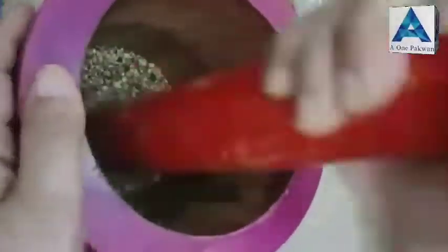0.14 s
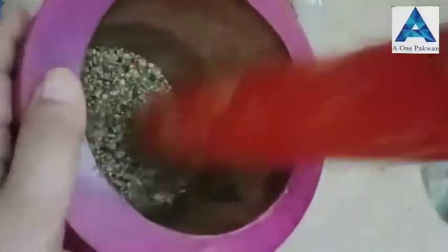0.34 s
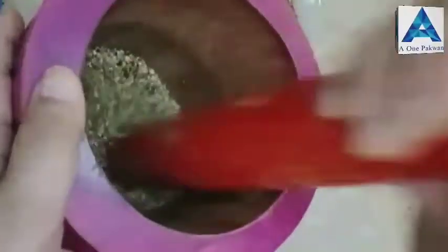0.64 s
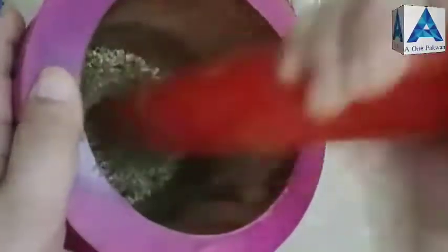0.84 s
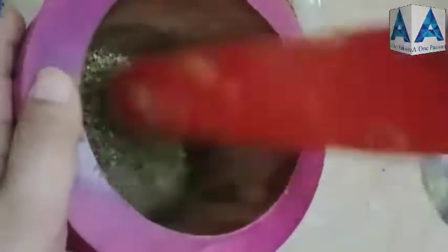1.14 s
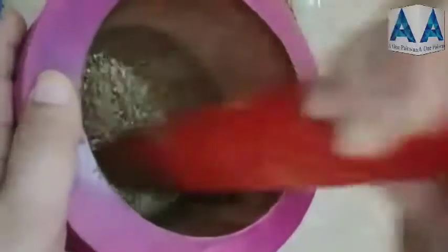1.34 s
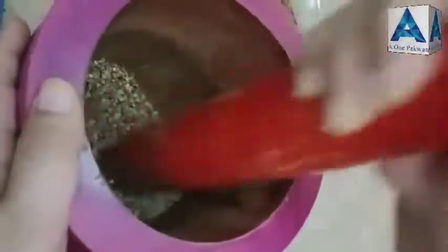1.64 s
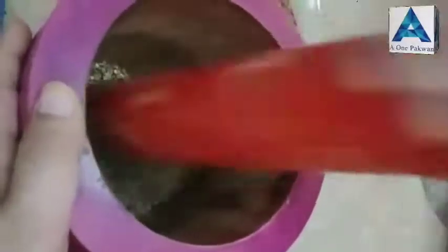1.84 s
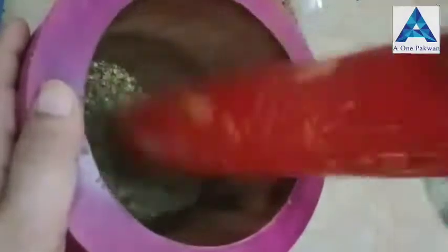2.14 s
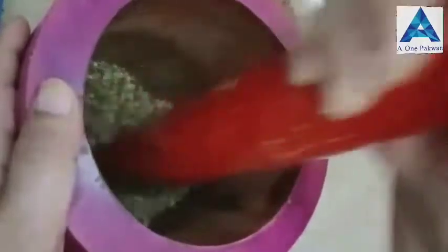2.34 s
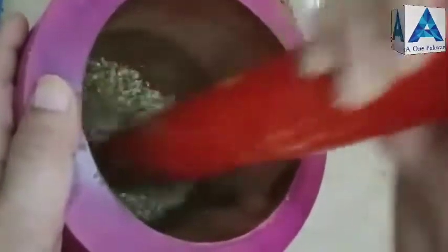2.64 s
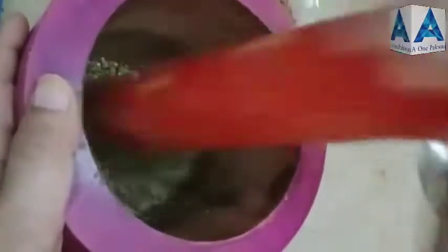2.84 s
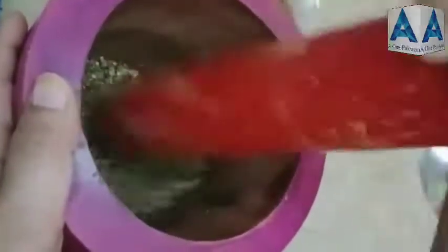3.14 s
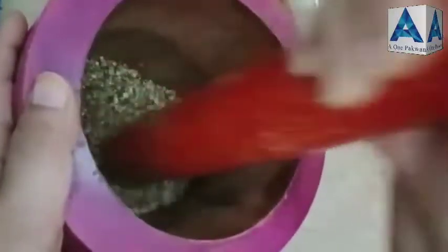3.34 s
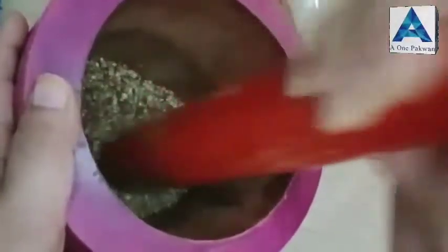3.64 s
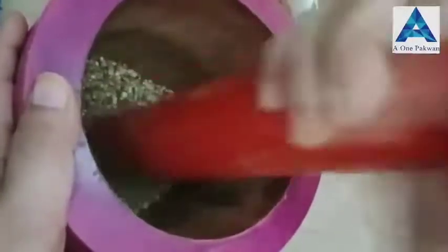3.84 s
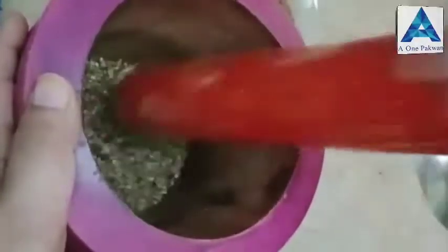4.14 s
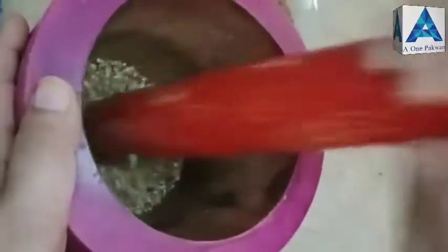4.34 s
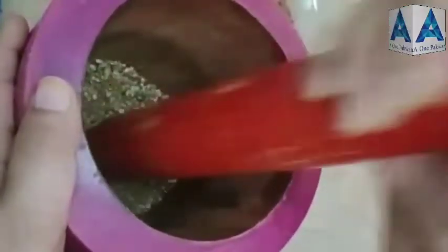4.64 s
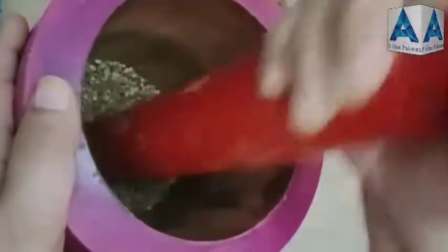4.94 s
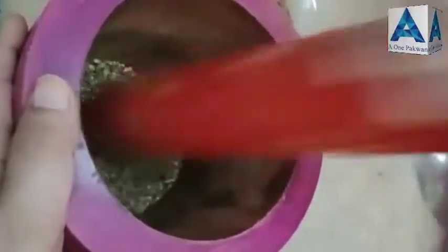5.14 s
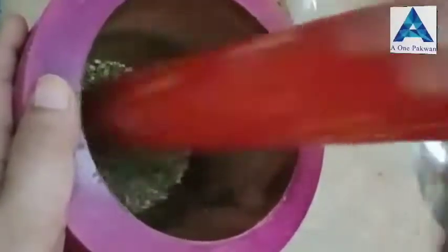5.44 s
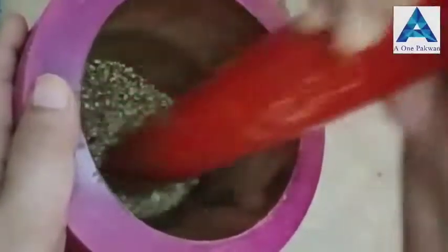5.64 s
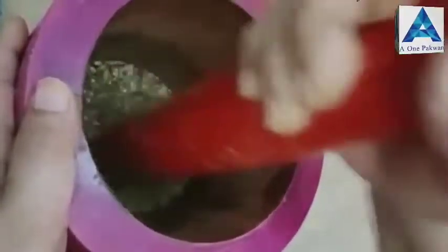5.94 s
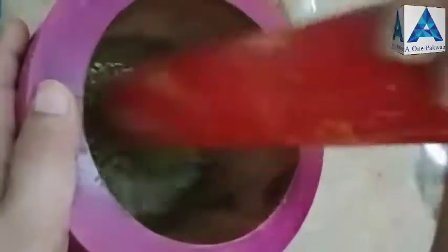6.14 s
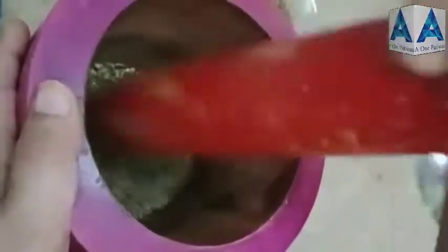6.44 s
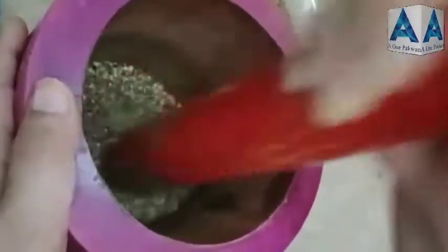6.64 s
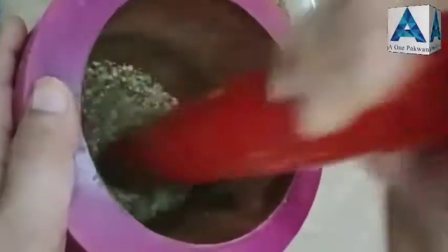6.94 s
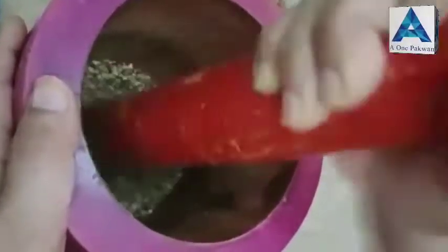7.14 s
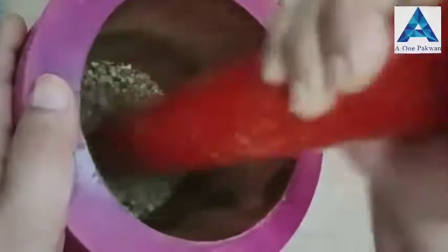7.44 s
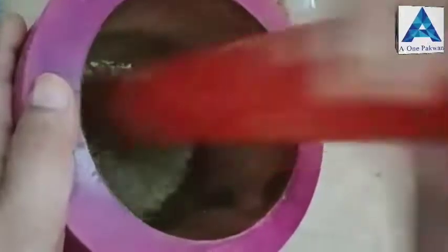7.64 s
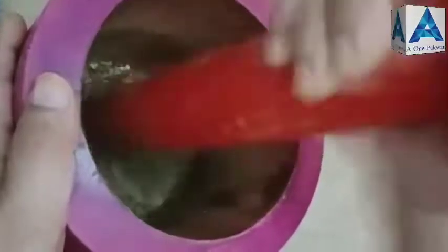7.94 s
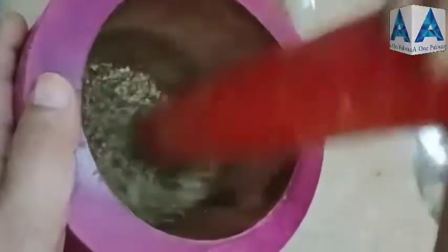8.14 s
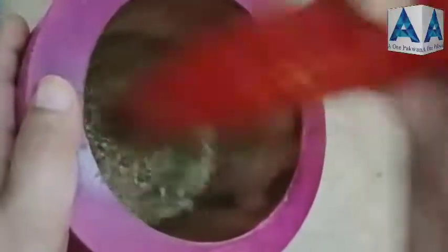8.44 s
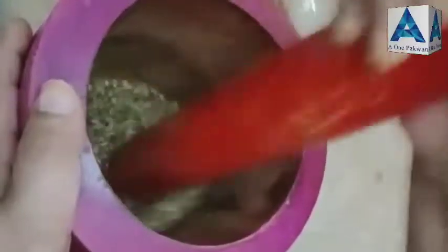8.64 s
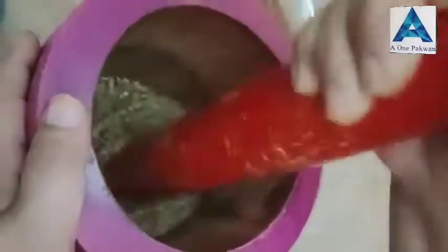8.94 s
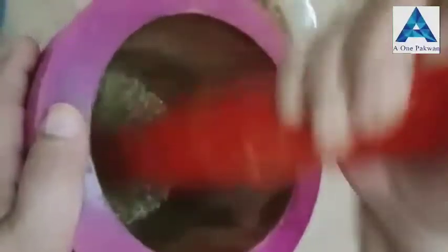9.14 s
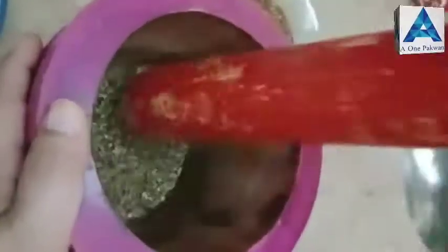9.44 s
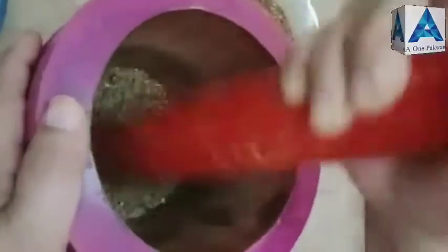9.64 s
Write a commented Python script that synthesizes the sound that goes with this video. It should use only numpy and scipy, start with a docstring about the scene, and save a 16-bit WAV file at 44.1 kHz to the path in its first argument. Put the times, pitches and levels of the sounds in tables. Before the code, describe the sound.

A close, slightly overloaded microphone in a small kitchen catches a pestle pounding hard seeds in a mortar. It opens on the tail of a push, then blows fall at about 0.3, 0.65, 0.97 and 1.3 s, roughly three a second, crisp and crunchy with light knocks. From 1.7 to 6 s they grow heavier: hollow woody knocks around the middle pitches, low counter thumps and short grinding pushes, with a softer blow near 4.3 s. From 6 to 8.1 s the crunch gets brighter and finer, and sliding seeds swish between blows, clearest from 7.2 to 8 s. From 8.25 to 9.5 s the pounding becomes hurried, irregular scraping and grinding, about ten strokes a second, with scattered knocks. It fades to a brief near-silence, with a faint rustle at 9.6 s, then one last crunchy knock at 9.74 s. Short, dull room echoes and faint, suppressed room noise lie underneath.

```python
"""On a kitchen counter stands a mortar in which a wooden pestle pounds hard seeds, then grinds them in quick strokes.
Each blow is a burst of seed fractures, a knock that rings the bowl, a thump in the counter and a short push;
pushes and grinding strokes are random grains of friction rung through resonances.
Seeds rustle as the pestle lifts, nearby walls echo the blows, and the room adds faint steady noise.
A small microphone stands close by; its noise suppression thins the tails and the hardest blows overload it."""
import sys
import numpy as np
from scipy import signal
from scipy.fft import rfft, irfft
from scipy.io import wavfile
from scipy.ndimage import uniform_filter1d

SR = 44100
rng = np.random.default_rng(int(sys.argv[2]) if len(sys.argv) > 2 else 0)


def makeup_ratio(level_db):
    """Linear amplitude ratio for a level in decibels (20 dB per factor of ten)."""
    decades = np.asarray(level_db, float) / 20
    return 10 ** decades


def generate_wav(signal):
    """Clip the signal to [-1, 1] and save it as 16-bit WAV at the path in sys.argv[1]."""
    frames = np.transpose(np.atleast_2d(signal))
    scaled = np.clip(frames, -1, 1) * 32767
    pcm = np.round(scaled).astype(np.int16)
    wavfile.write(sys.argv[1], SR, pcm)


N = 431298

# Spectrum of the room's steady noise: f/Hz, relative level/dB
ROOM_SPECTRUM = [(24, -41), (40, 1.5), (297, -1.5), (685, -5.5), (934, -6.5), (1130, -11), (1340, -9.5),
                 (12000, -40.5), (15600, -70), (22000, -120)]
# Resonances of counter, bowl, seed grit, rustling seeds, their top sheen, a metal utensil and sliding seeds:
# f/Hz, width/Hz, relative level/dB
COUNTER_MODES = [(94.8, 14, 2), (140.4, 37, -4), (195.1, 20, -1), (285.5, 22, -2.5)]
BOWL_MODES = [(359, 100, -8.5), (372, 31, -7.5), (392.4, 82, -11.5), (497, 24, 2), (533, 26, -0.5),
              (583.6, 43, -2.5), (632, 56, -7.5), (734, 100, -8.5), (841.5, 50, -5), (957, 310, -10),
              (997, 130, -5), (1117, 7.2, -14)]
GRIT_MODES = [(1282.6, 49, -2), (1526.5, 102, -0.5), (1631, 127, -4), (1830, 95, -3.5), (1969, 61, -6),
              (2320, 120, -5.5), (2499, 110, -0.5), (2629, 73, 2.5), (2788, 77, 0.5), (3000, 310, -1),
              (3353, 57, -16)]   # they also serve as the bowl's upper modes
RUSTLE_MODES = [(3670, 610, -4.5), (3943, 82, 2.5), (4155, 54, -2.5), (4568, 400, -7.5), (4680, 67, -3.5),
                (5000, 89, -2), (5170, 200, -3.5), (5785, 190, -8)]
SHEEN_MODES = [(7600, 1200, -10), (9200, 2200, -16.5), (12300, 2100, -34.5)]
UTENSIL_MODES = [(3680, 40, -1.5), (4510, 36, 5), (4270, 39, -7.5), (4800, 23, -7.5)]
SLIDE_MODES = [(2600, 720, -10), (4800, 2500, -4.5), (3830, 230, -2.5), (4300, 100, -0.5), (5630, 500, -10),
               (7230, 320, 8.5)]
# Seeds slide back as the pestle lifts: middle t/s, level/dB, half length/s
LIFTS = [(.19, -56.5, 0.036), (0.539, -54, .035), (0.883, -44.5, 0.021), (1.219, -41, 0.033),
         (3.262, -48, 0.032), (3.55, -51, 0.039), (3.874, -42, .02), (4.184, -55, 0.053),
         (6.868, -62.5, 0.041), (7.167, -40.5, 0.035), (7.452, -32.5, 0.041), (7.745, -32.5, 0.031),
         (8.008, -33.5, 0.037), (9.6, -41, 0.034)]
# The pestle pushes on after a blow: start t/s, length/s, counter rumble level/dB, bowl rub level/dB, grit level/dB
PUSHES = [(-.04, 0.12, -18, -14, -31.5), (0.28, 0.14, -23.5, -22, -32), (0.639, 0.14, -38, -30, -32.5),
          (0.981, 0.15, -35.5, -28, -31), (1.315, 0.15, -28, -25.5, -27.5),
          (1.664, 0.16, -22, -16.5, -23.5), (2.018, 0.15, -19, -14, -27), (2.366, 0.16, -23, -12.5, -29.5),
          (2.687, 0.16, -24, -23, -28), (3.01, .16, -13.5, -11, -26.5), (3.333, 0.14, -14, -10, -27),
          (3.661, .15, -17.5, -10.5, -31), (3.974, 0.064, -20.5, -24, -41), (4.307, .04, -40, -45, -44.5),
          (4.645, 0.11, -23.5, -14, -34.5), (4.98, 0.076, -18.5, -10, -39.5), (5.292, 0.1, -20, -17.5, -36),
          (5.623, 0.18, -23.5, -22, -25.5), (5.986, 0.18, -21.5, -21.5, -27),
          (6.342, 0.11, -21, -22.5, -30), (6.66, .12, -21.5, -19.5, -30), (6.956, 0.13, -23.5, -16, -29),
          (7.242, .12, -26.5, -22.5, -27.5), (7.536, .11, -25, -25.5, -26.5),
          (7.791, .11, -22.5, -25, -29.5), (8.081, .13, -24, -19.5, -24), (8.3, .05, -37, -17, -35),
          (9.734, .1, -23.5, -21.5, -30.5)]
# Quick grinding strokes: peak t/s, rise/s, counter rumble level/dB, bowl rub level/dB, grit level/dB
GRINDS = [(8.25, .03, -36.5, -44.5, -36), (8.359, 0.023, -31.5, -22, -21.5), (8.449, .03, -42, -24, -18),
          (8.501, .025, -34.5, -25.5, -20), (8.594, 0.027, -37, -24.5, -14),
          (8.63, .025, -21, -20.5, -22.5), (8.74, 0.041, -36.5, -28, -18.5),
          (8.794, 0.016, -29.5, -22.5, -24.5), (8.85, .025, -32, -27, -21.5),
          (8.905, 0.033, -23.5, -18.5, -22.5), (9.0, 0.027, -34.5, -24, -15.5),
          (9.038, 0.039, -29, -29.5, -16.5), (9.16, 0.054, -42.5, -28, -20),
          (9.211, .025, -30.5, -26, -28.5), (9.278, 0.027, -46, -22.5, -15.5),
          (9.335, 0.039, -26, -24.5, -20), (9.441, 0.032, -38.5, -34, -29), (9.498, .03, -44, -37.5, -37.5),
          (9.62, 0.066, -55, -60, -43.5), (9.69, .03, -54.5, -58.5, -49)]
# How friction runs; columns of the next six: counter, bowl, grit, rustle, upper bowl modes
# Change of level just after the blow: counter, bowl and rustle jump, grit and upper modes dip: level/dB
JOLT_DB = (9, 3.5, -18, 5, -2.5)
# Fall while the pestle slows: rate/(dB/s)
SAG_DB_PER_S = (63.3, 86.4, 30, 49.7, 120)
# Fall once it stops: rate/(dB/s)
RELEASE_DB_PER_S = (330, 210, 550, 600, 350)
# Shift of release when few seeds cushion the pestle: the bowl rings on, grit stops sooner:
# shift/(s per dB of bareness)
LINGER_S_PER_DB = (0.0021, 0.00544, -0.00154, 0.0093, 0.0084)
# Change of level when few seeds cushion it: change/(dB per dB of bareness)
BARE_DB_PER_DB = (0, -0.046, 0, -0.23, 0.025)
# Fade time of a grinding stroke against its rise: ratio
FADE_PER_RISE = (1.2, 1.8, 1.3, 1.3, 0.69)
# Seeds crushed: t/s, relative peak level/dB, length/s, relative brightness/dB
CRUNCHES = [(0.027, -19, 0.014, 7.5), (0.2805, -0.5, 0.0068, 1), (0.34, -12.5, 0.017, -5.5),
            (0.389, -23, 0.02, 0.5), (0.627, -1, 0.0092, 3.5), (0.6722, -3.5, 0.011, -2),
            (0.965, -3.5, 0.014, 5.5), (1.017, -12.5, 0.0054, 3), (1.054, -11.5, 0.0068, -4),
            (1.114, -23, 0.0074, 1.5), (1.3161, -1.5, 0.01, 4), (1.367, -12.5, 0.0093, 4),
            (1.436, -8.5, 0.0038, -1.5), (1.6655, -7, 0.0086, 4.5), (1.707, -9.5, 0.008, 0),
            (1.772, -10.5, 0.0075, -11.5), (2.018, 0, 0.0099, 4.5), (2.1086, -13.5, 0.0075, 5.5),
            (2.356, 3.5, 0.0073, 1), (2.362, -3, 0.0072, -3.5), (2.4063, -9, 0.0065, 2.5),
            (2.434, -12, 0.008, -1), (2.6742, -8.5, 0.013, 4), (2.685, 0, 0.0077, 5.5),
            (2.725, -7.5, 0.022, 3), (2.757, -8.5, 0.013, -3.5), (3.0121, 0.5, 0.0061, -1.5),
            (3.097, -13.5, 0.0056, 2), (3.3276, -7, 0.013, -1.5), (3.6585, -5, 0.0078, 5.5),
            (3.9783, -3.5, 0.0098, 5.5), (4.2934, -11, 0.008, -1), (4.3018, -9.5, 0.014, 5),
            (4.645, -4, 0.0059, 6), (4.6618, -13.5, 0.0091, -1.5), (4.9711, -11.5, 0.012, 2.5),
            (4.9782, -7.5, 0.0075, -3.5), (5.2953, -3, 0.0086, 1), (5.624, 0.5, 0.0058, -1.5),
            (5.726, -10.5, 0.015, -8), (5.9945, -9.5, 0.0085, 10), (6.04, -6, 0.0091, 2),
            (6.09, -2, 0.0085, -12.5), (6.256, -32.5, 0.0084, 16), (6.327, -5.5, 0.008, 8.5),
            (6.5657, -30.5, 0.0031, 26.5), (6.6462, 1.5, 0.0058, -2.5), (6.684, -8.5, 0.0062, 7.5),
            (6.9606, 1, 0.005, 12), (7.002, -8, 0.011, 3), (7.1456, -37, 0.0072, 26),
            (7.248, -5.5, 0.008, 10.5), (7.315, -10, 0.017, -2.5), (7.5318, -1, 0.0091, 6.5),
            (7.575, 0, 0.015, -4), (7.8057, -4, 0.013, 7), (7.854, -8.5, 0.035, 0),
            (7.889, -10.5, 0.015, -2.5), (8.0624, 2, 0.0049, 5.5), (8.1106, 0, 0.008, -1),
            (8.1333, -3.5, 0.018, -9), (8.263, -15.5, 0.0098, -0.5), (8.289, -12.5, 0.0027, -3.5),
            (8.3565, -3, 0.008, 6), (8.4455, -4.5, 0.0067, -12), (8.464, -9.5, 0.011, 3.5),
            (8.496, -10.5, 0.021, -3), (8.581, -5.5, 0.016, 0), (8.715, -11.5, 0.024, -9),
            (8.788, -8, 0.012, -2.5), (8.851, -4.5, 0.024, 1), (8.877, -7.5, 0.0073, 4.5),
            (9.0217, -5, 0.008, -6), (9.155, -2.5, 0.013, 1.5), (9.2743, -4, 0.01, -4.5),
            (9.2972, 1.5, 0.011, -4.5), (9.321, -1, 0.01, -1), (9.346, -10.5, 0.024, -2),
            (9.4344, -5.5, 0.0046, -4), (9.7433, -6, 0.013, 13)]
# Pestle meets the bowl: t/s, relative peak level/dB, relative counter thump level/dB, relative hardness/dB
KNOCKS = [(0.288, -11, -10, 31), (0.629, -59, -30, 10.5), (0.671, -24, -24.5, 10), (0.975, -22.5, -23, 10),
          (1.024, -19.5, -28.5, 14), (1.326, -16.5, -14, 11.5), (1.678, 0.5, -19, 1),
          (2.029, -1.5, -30.5, -3), (2.373, 3, -31.5, 3), (2.694, -25.5, -29, 3.5), (3.015, 2.5, -11, 1.5),
          (3.098, -7.5, -16, 3.5), (3.332, 1, -11.5, 5), (3.658, -4.5, -19, -4), (3.666, 8, -20, -4.5),
          (3.671, -6.5, -19, -9.5), (3.984, -9, -15, -22.5), (4.66, 1, -22, 2), (4.972, 1.5, -10, -15.5),
          (4.985, -1, -16.5, 0), (5.305, 1.5, -19, 3), (5.626, -9, -18.5, 3), (5.639, 0, -26.5, -6.5),
          (6.001, 0, -11, -8.5), (6.335, -5.5, -10, -2.5), (6.653, -4.5, -10.5, -3.5),
          (6.962, -16.5, -26, -7.5), (6.968, -5, -19, -1), (6.993, -10, -21.5, 7.5), (7.253, -10, -23, 12),
          (7.533, -12, -14, 7), (7.811, -11.5, -11.5, 11.5), (8.066, -1, -9, 0), (8.098, -7, -26.5, 4),
          (8.293, -15.5, -39.5, -8), (8.306, -4, -47, 2), (8.474, -16.5, -23, 11), (8.611, -10, -32.5, 6),
          (8.735, -18, -26.5, 14), (8.883, -1, -25, -1), (8.905, -5.5, -14, -9), (8.999, -21.5, -32, 11),
          (9.152, -18, -26.5, 19), (9.274, -16, -23, 9), (9.744, -9, -14, 8)]


def rms_one(x):
    """Scale to unit rms."""
    return x / np.sqrt(np.mean(x ** 2) + 1e-20)


def cut(x, hz, kind, order=2):
    """Butterworth filter."""
    return signal.sosfilt(signal.butter(order, hz, kind, fs=SR, output="sos"), x)


def drift(rate):
    """Random wander of spread 1, turning at most 80 times a second."""
    steps = rng.standard_normal(int(N / SR * 80) + 2)
    place = np.arange(N) / SR * min(rate, 80)
    # straight lines between the steps lose spread; the factor restores it
    return np.interp(place, np.arange(len(steps)), steps) * np.sqrt(1.5)


def resonate(x, hz, width):
    """Two-pole resonance, gain 1 on top."""
    r = np.exp(-np.pi * width / SR)
    top = np.array([1, 0, -1]) * (1 - r * r) / 2
    bottom = [1, -2 * r * np.cos(2 * np.pi * hz / SR), r * r]
    return signal.lfilter(top, bottom, x + 1e-18)


def grains(per_s, spread_db):
    """Tiny fractures at random moments, a few much larger than the rest; rms 1."""
    sizes = makeup_ratio(spread_db * np.minimum(rng.exponential(1, N), 5)) * rng.choice([-1, 1], N)
    return rms_one(sizes * (rng.random(N) < per_s / SR))


def rubbed(modes, per_s, spread_db, wander_db):
    """Grains set the modes going; the shifting contact favours now one mode, now another; rms 1."""
    force = grains(per_s, spread_db)
    out = np.zeros(N)
    for k, (hz, width, db) in enumerate(modes):
        contact = force * makeup_ratio(wander_db * drift(9.0))
        out += (-1) ** k * makeup_ratio(db) * resonate(contact, hz, width)
    return rms_one(out)


def room_tone():
    """Faint steady noise of the room: random noise shaped by its spectrum."""
    hz, db = np.transpose(ROOM_SPECTRUM)
    bins = np.maximum(np.arange(N // 2 + 1) * SR / N, 1)
    shape = makeup_ratio(np.interp(np.log(bins), np.log(hz), db))
    noise = irfft(rfft(rng.standard_normal(N)) * shape, N)
    return makeup_ratio(-44.5) * rms_one(noise)


def kitchen(x):
    """Echoes of nearby walls: a dull noise tail that dies away."""
    t60_s, level_db = 0.3, -17.5
    t = np.arange(round(.3 * SR)) / SR
    tail = cut(rng.standard_normal(len(t)), 4500, "low") * makeup_ratio(-60 * t / t60_s)
    tail = tail * (t > .004)   # the walls answer after 4 ms
    return makeup_ratio(level_db) * signal.fftconvolve(x, tail / np.sqrt(np.sum(tail ** 2)))[:N]


def lifts():
    """Seeds slide back as the pestle lifts: a soft bright swish that swells and fades."""
    t = np.arange(N) / SR
    swell = sum(makeup_ratio(db) * np.exp(-((t - s) / half) ** 2) for s, db, half in LIFTS)
    return swell * rubbed(SLIDE_MODES, 12000, 2.5, 1.5)


def friction_levels(s, db):
    """Levels of counter, bowl, grit, rustle and upper bowl modes; rustle grows as the seeds get finer."""
    rumble_db, rub_db, grit_db = db
    rustle_db = grit_db - 11 + 0.46 * s
    return np.array([rumble_db, rub_db, grit_db, rustle_db, rub_db])[:, None]


def friction_db():
    """Friction over time: powers of pushes, which start, sag and release, and of swelling grinding strokes add up."""
    push_rise_s, jolt_s, cushion_db = 0.0056, 0.01, 10
    t = np.arange(0, N + 32, 32) / SR
    power = 1e-9
    columns = (JOLT_DB, SAG_DB_PER_S, RELEASE_DB_PER_S, LINGER_S_PER_DB, BARE_DB_PER_DB, FADE_PER_RISE)
    jolt, sag, release, linger, bare, fade = (np.array(v)[:, None] for v in columns)
    for s, length, *db in PUSHES:
        age = np.maximum(t - s, 0)
        # rub far above grit: few seeds cushion the pestle
        bare_db = max(db[1] - db[2] - cushion_db, 0)
        stopped = np.maximum(age - length - linger * bare_db, 0)
        shape_db = bare_db * bare + jolt * np.exp(-age / jolt_s) - sag * age - release * stopped
        rise = np.minimum(age / push_rise_s, 1)
        power = power + (makeup_ratio(friction_levels(s, db) + shape_db) * rise) ** 2
    for s, rise, *db in GRINDS:
        spread = rise * np.where(t > s, fade, 1)
        power = power + makeup_ratio(2 * friction_levels(s, db)) * np.exp(-2 * ((t - s) / spread) ** 2)
    return [np.interp(np.arange(N) / SR, t, row) for row in 10 * np.log10(power)]


def utensil_buzz(rub_db):
    """Something metal on the shaken counter buzzes along with the rub, less than in proportion."""
    return makeup_ratio(.75 * rub_db - 33) * rubbed(UTENSIL_MODES, 3000, 2.5, 3.5)


def counter_and_bowl_rub(rumble_db, rub_db, upper_db):
    """Friction shakes counter and bowl, and reaches the high modes ever more weakly."""
    counter = makeup_ratio(rumble_db) * rubbed(COUNTER_MODES, 2000, 3.0, 3.4)
    bowl = makeup_ratio(rub_db) * cut(rubbed(BOWL_MODES, 1500, 3.0, 3.68), 1900, "low")
    upper_modes = [(hz, width, -6.0 - 15.0 * np.log2(hz / 1000)) for hz, width, _ in GRIT_MODES + RUSTLE_MODES]
    upper = makeup_ratio(upper_db - 8.5) * cut(rubbed(upper_modes, 1500, 2.2, 2.7), 4200, "low", order=4)
    return counter + bowl + upper


def seed_friction(grit_db, rustle_db):
    """Seeds grate, snap and rustle in stick and slip, a fast random wander of level."""
    snaps = makeup_ratio(-6) * rubbed(GRIT_MODES + RUSTLE_MODES, 120, 3.1, 4.7)   # lone seeds giving way
    grating = cut(rubbed(GRIT_MODES, 2300, 3.8, 3.0), 3100, "low")
    grit = makeup_ratio(grit_db) * (grating + cut(snaps, 6000, "low"))
    rustle = makeup_ratio(rustle_db) * cut(rubbed(RUSTLE_MODES, 3900, 3.5, 1.5), 4900, "low", order=4)
    # the top grows a little faster than the rustle: brisk scraping brings it out
    sheen = makeup_ratio(1.1 * (rustle_db + 27) - 34.5) * rubbed(SHEEN_MODES, 3500, 1.3, 1.1)
    return makeup_ratio(2.0 * drift(45)) * (grit + rustle + sheen)


def strokes():
    """The pestle pushes through the seeds: the same pushes and strokes drive counter, bowl, utensil and seeds."""
    rumble_db, rub_db, grit_db, rustle_db, upper_db = friction_db()
    low = counter_and_bowl_rub(rumble_db, rub_db, upper_db)
    return low + utensil_buzz(rub_db) + seed_friction(grit_db, rustle_db)


def crunches():
    """A burst of breaking seeds swells over a few ms and dies at a pace set by its length."""
    dull, bright = np.zeros(N), np.zeros(N)
    lead_s = .02
    t = np.arange(round(.1 * SR)) / SR - lead_s
    for s, peak_db, length, bright_db in CRUNCHES:
        age = (t - .002) / max(length, .003)
        burst = makeup_ratio(peak_db - 4.5) / (np.exp(-age / 0.19) + np.exp(age / 0.55))
        at = np.clip(round((s - lead_s) * SR) + np.arange(len(t)), 0, N - 1)
        dull[at] += burst
        bright[at] += makeup_ratio(bright_db - 10.0) * burst
    damped = [(hz, 1.6 * width, db) for hz, width, db in GRIT_MODES]   # the pressed pestle damps the bowl
    body = cut(rubbed(damped, 5000, 4.3, 4.3), 4000, "low")
    body = body + makeup_ratio(-14.5) * rubbed(BOWL_MODES, per_s=1600, spread_db=4.5, wander_db=2.0)
    return dull * body + bright * rubbed(RUSTLE_MODES + SHEEN_MODES, 6000, 3.8, 2.9)


def struck(modes, levels_db, contact_hz, scatter_db):
    """Each knock strikes every mode with a strength of its own; a soft contact is a dulled click."""
    at = np.round(np.array(KNOCKS)[:, 0] * SR).astype(int)
    luck = rng.standard_normal((len(at), len(modes)))
    out = np.zeros(N)
    for k, (hz, width, db) in enumerate(modes):
        clicks = np.zeros(N)
        # the last factor makes the ring equally high for every width
        clicks[at] = makeup_ratio(levels_db(hz) + db + scatter_db * luck[:, k]) * SR / (2 * np.pi * width)
        out += resonate(clicks, hz, width)
    return cut(out, contact_hz, "low", order=4)


def knocks():
    """The bowl rings, damped by the pestle and brighter for a hard contact, and the counter booms under it."""
    _, peak_db, thump_db, hard_db = np.transpose(KNOCKS)
    tilt_db_per_octave = np.minimum(hard_db - 6.5, 2)
    damped = [(hz, 1.4 * width, db) for hz, width, db in BOWL_MODES + GRIT_MODES]

    def bowl_db(hz):
        """Hardness tilts the level of the modes around 500 Hz."""
        return peak_db - 11.0 + tilt_db_per_octave * np.log2(hz / 500)

    bowl = struck(damped, bowl_db, contact_hz=2900, scatter_db=6.5)
    counter = struck(COUNTER_MODES, lambda hz: thump_db - 3, contact_hz=350, scatter_db=2.5)
    return bowl + counter


def scene():
    """The room, lifts and strokes, and the blows with their echoes."""
    blows = knocks() + crunches()
    return (blows + kitchen(blows) + strokes() + lifts() + room_tone())[None]


def suppress(x, margin_db, depth_db, memory):
    """Noise suppressor: takes the noise from quiet moments and ducks bands near it, so tails end in thin streaks."""
    spec = signal.stft(x, nperseg=1024, noverlap=768)[2]
    power = np.abs(spec) ** 2
    quiet = uniform_filter1d(np.percentile(power, 25, axis=1), size=17)
    noise = quiet * makeup_ratio(2 * margin_db) + 1e-14
    kept = np.zeros(len(power))
    for i in range(power.shape[1]):
        # a band that was open tends to stay open
        clean = memory * kept + (1 - memory) * np.maximum(power[:, i] - noise, 0)
        gain = np.maximum(clean / (clean + noise), makeup_ratio(depth_db))
        kept = gain ** 2 * power[:, i]
        spec[:, i] *= gain
    return signal.istft(spec, nperseg=1024, noverlap=768)[1][:N]


def low_pass(x):
    """Removes everything above the highest recorded frequency."""
    return signal.sosfilt(signal.butter(12, 16290, fs=SR, output="sos"), x)


def record(dry):
    """Close microphone: steep treble shoulder, small bumps higher up, no deep bass; noise suppressed, peaks overload."""
    heard = cut(dry, 5390, "low", order=6)
    heard = heard + makeup_ratio(-15.5) * cut(dry, [6700, 7900], "band")
    heard = heard + makeup_ratio(-17.5) * cut(dry, [8500, 11000], "band")
    heard = cut(heard[0], 75, "high", order=3)
    heard = suppress(heard, margin_db=7.0, depth_db=-15, memory=.95)[None]
    mix = np.clip(1.249 * np.tanh(heard / 1.266), -1, 1)   # soft overload, then a hard limit
    return low_pass(mix)


dry = scene()
out = record(dry)
generate_wav(out)
```